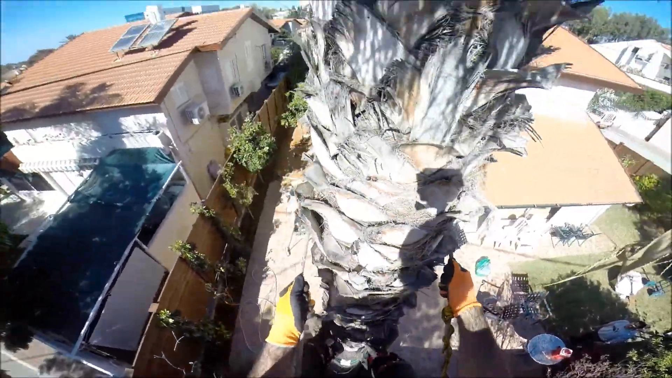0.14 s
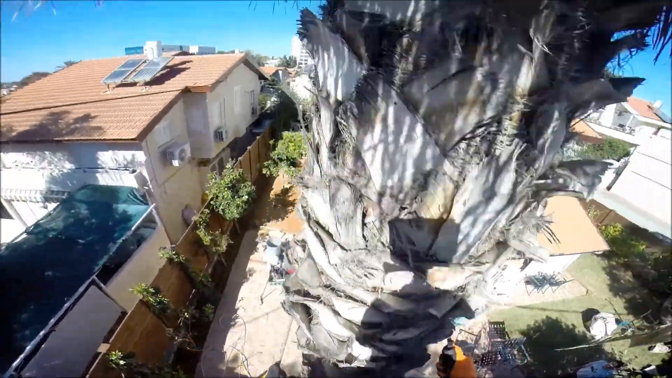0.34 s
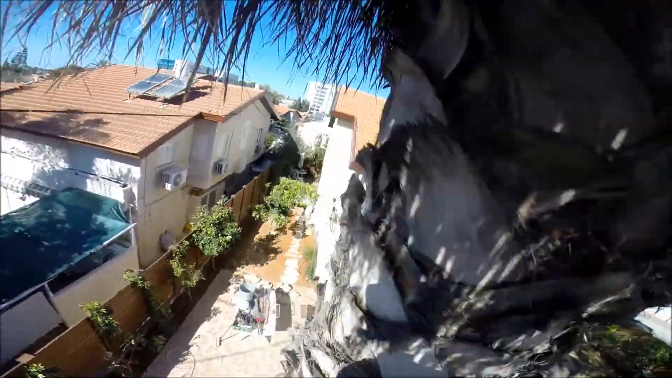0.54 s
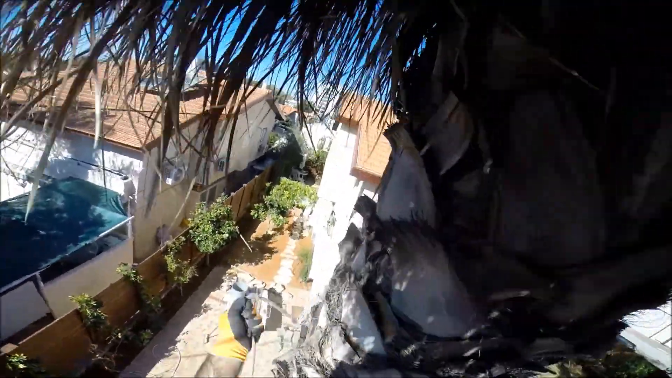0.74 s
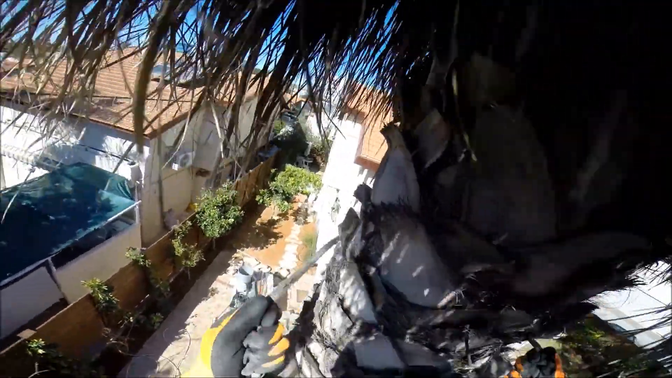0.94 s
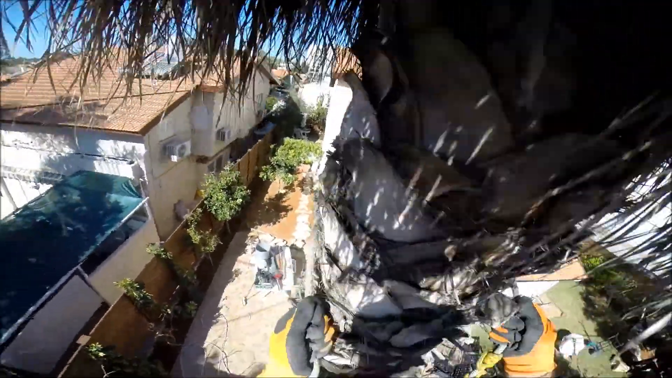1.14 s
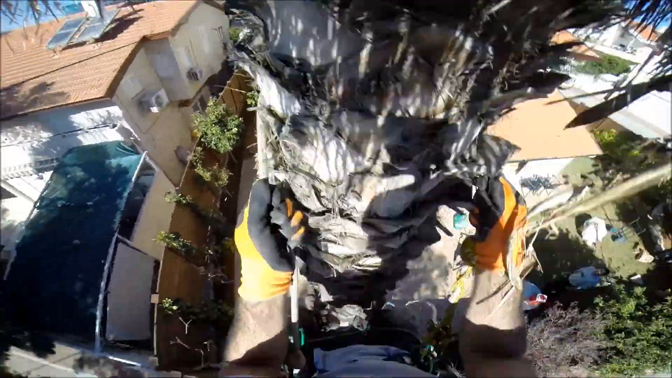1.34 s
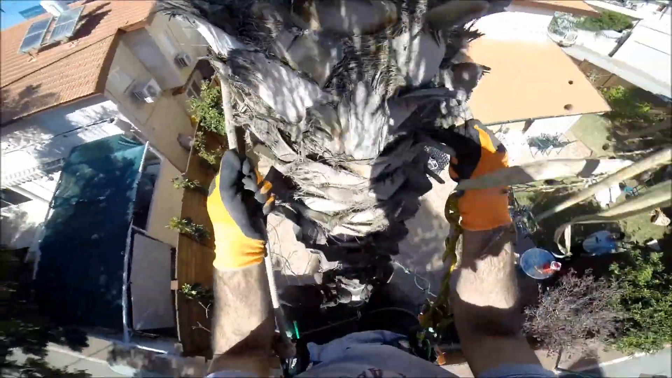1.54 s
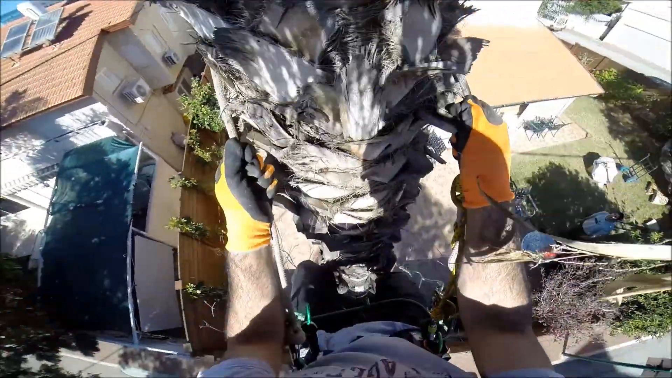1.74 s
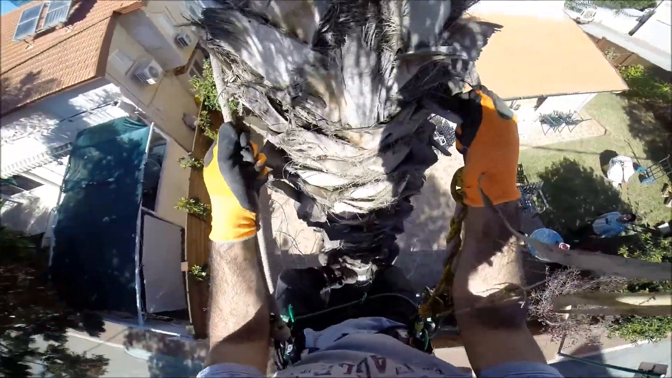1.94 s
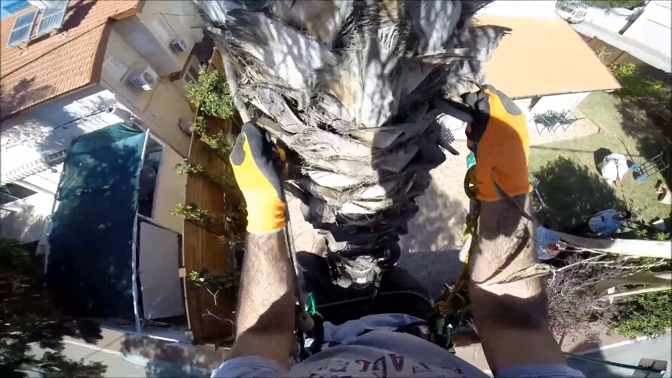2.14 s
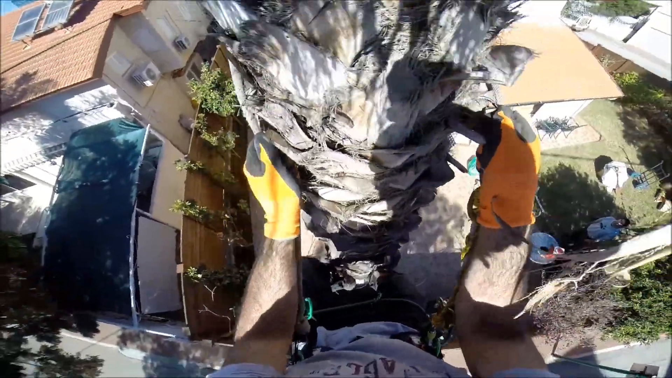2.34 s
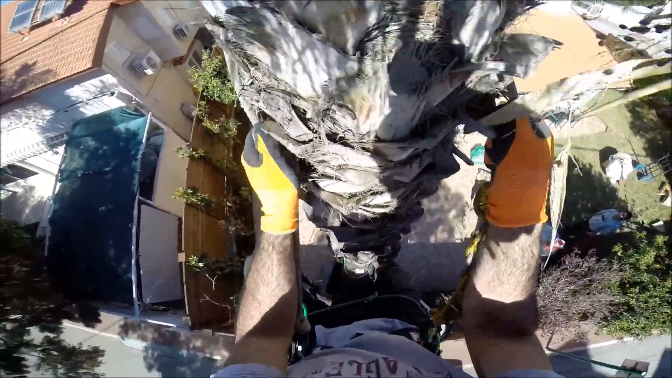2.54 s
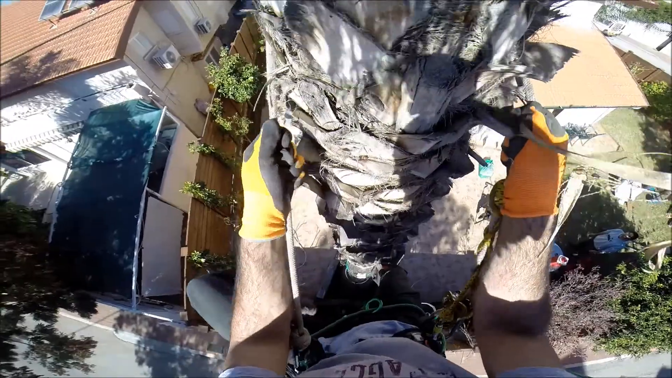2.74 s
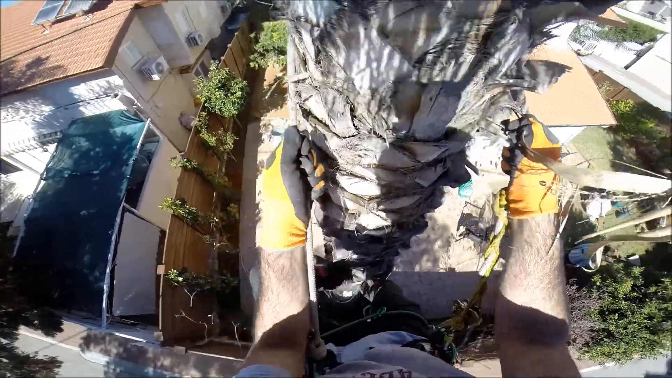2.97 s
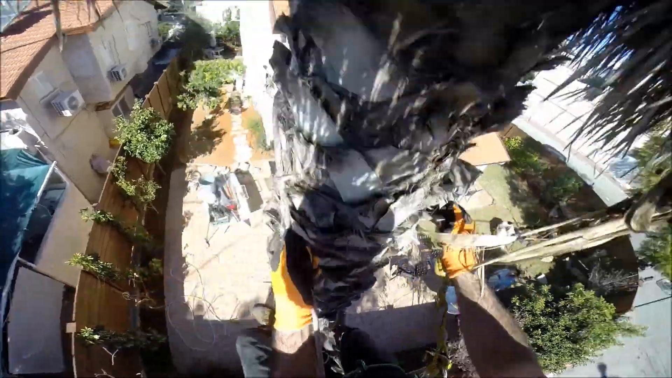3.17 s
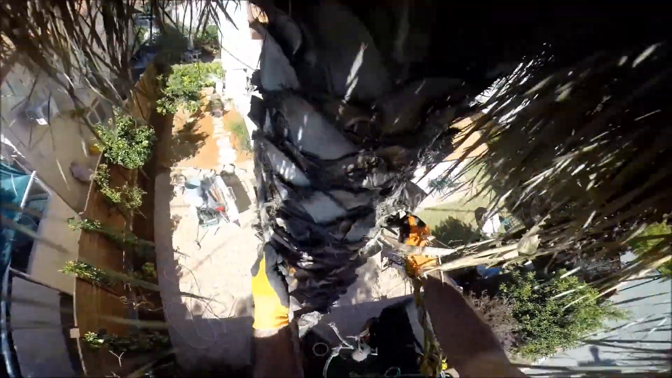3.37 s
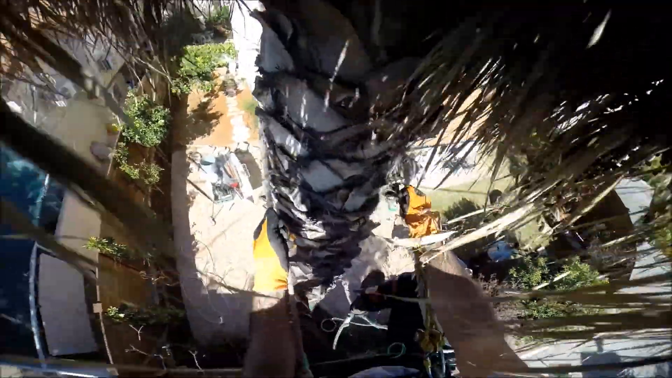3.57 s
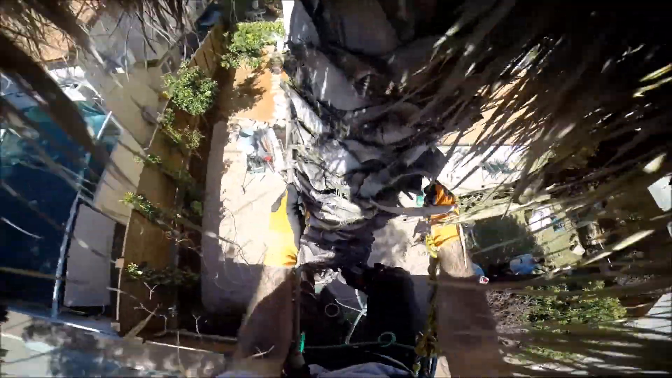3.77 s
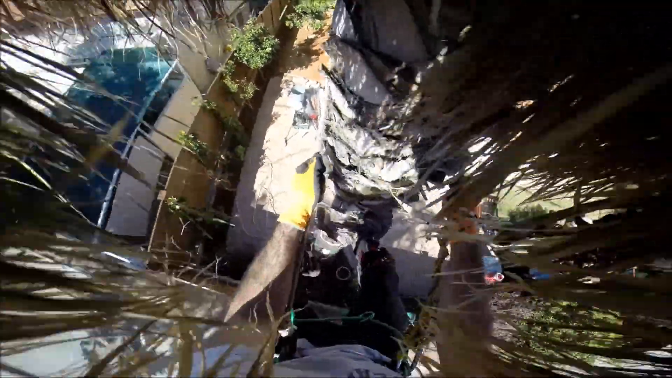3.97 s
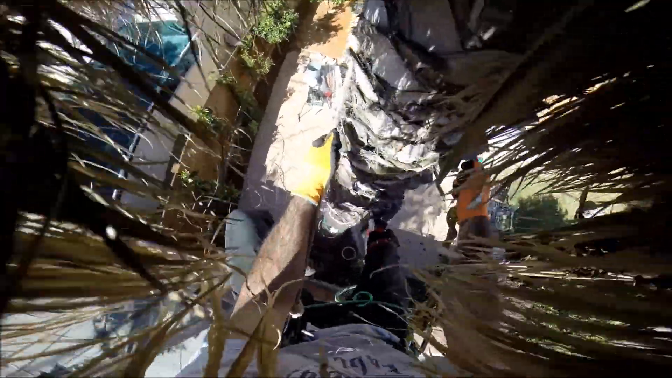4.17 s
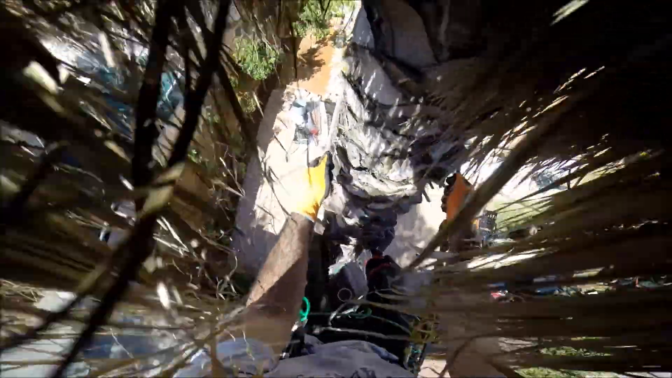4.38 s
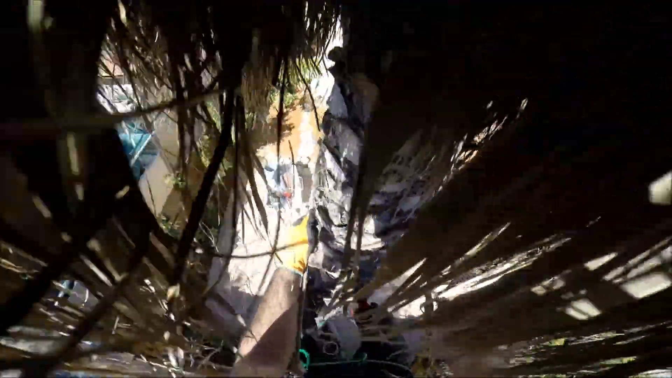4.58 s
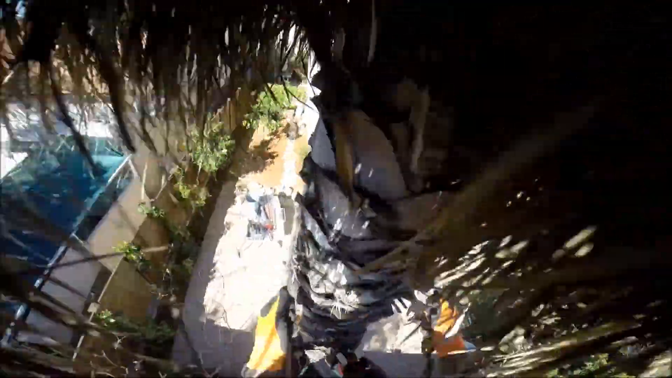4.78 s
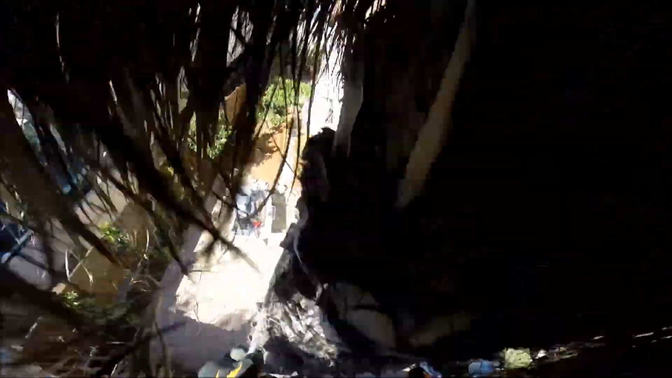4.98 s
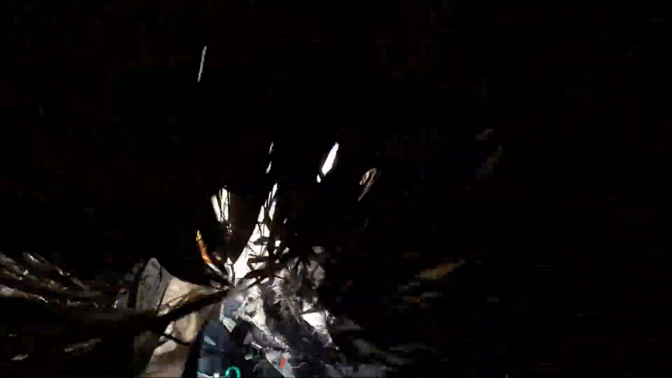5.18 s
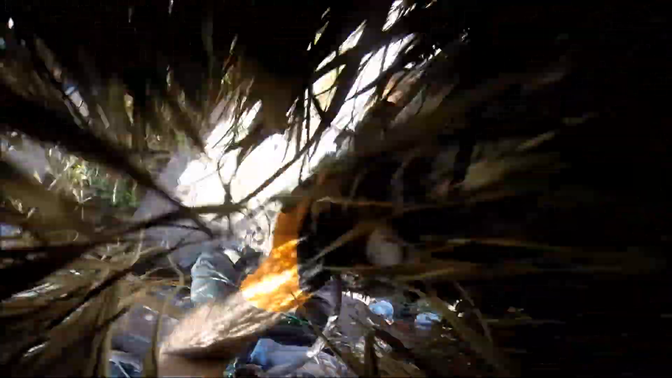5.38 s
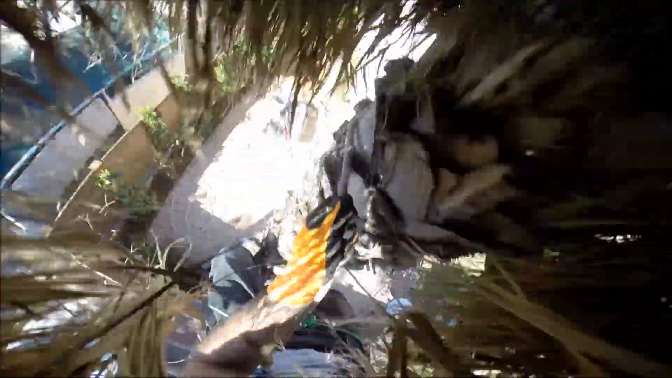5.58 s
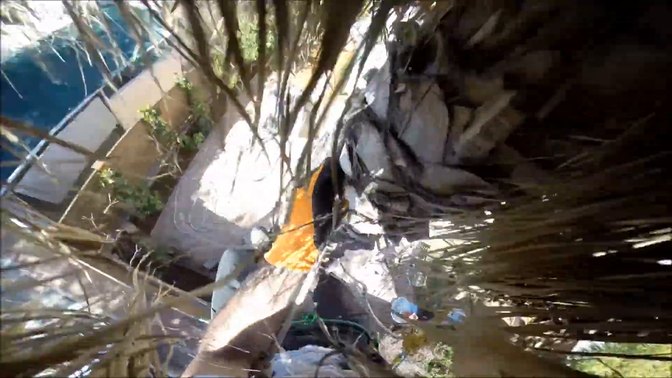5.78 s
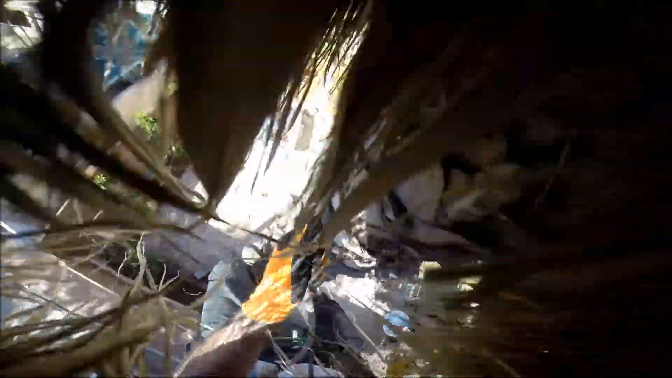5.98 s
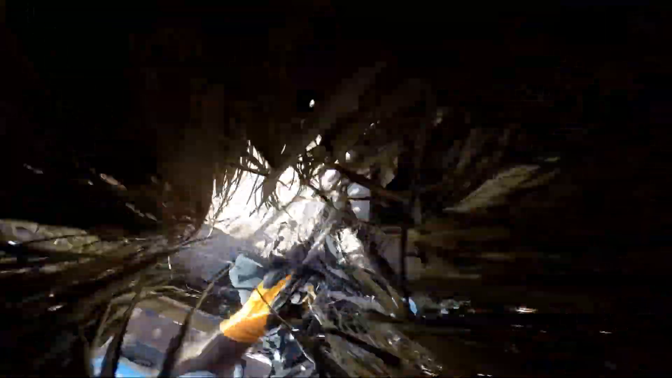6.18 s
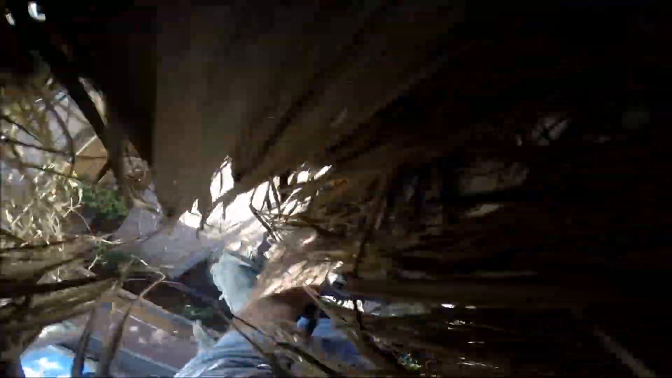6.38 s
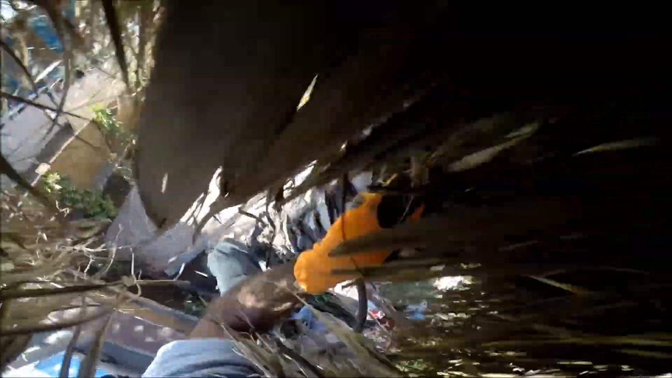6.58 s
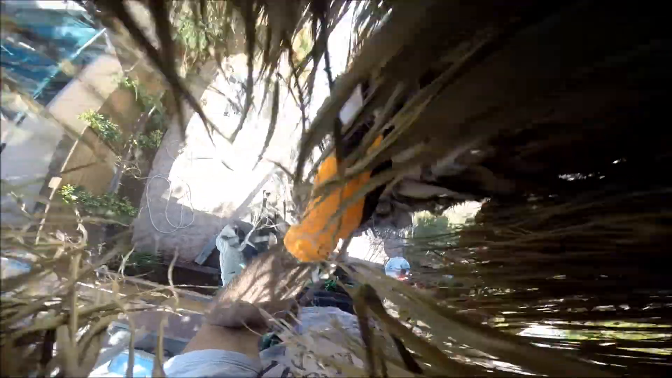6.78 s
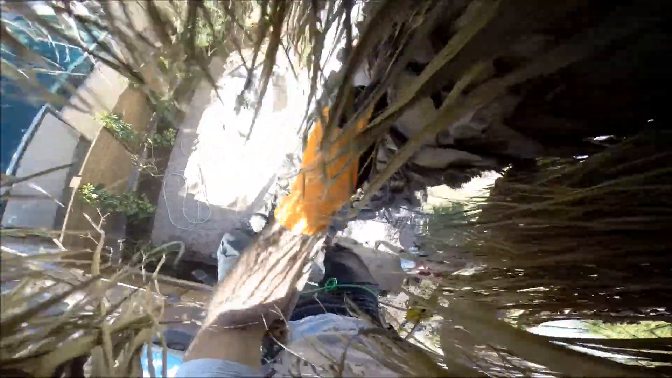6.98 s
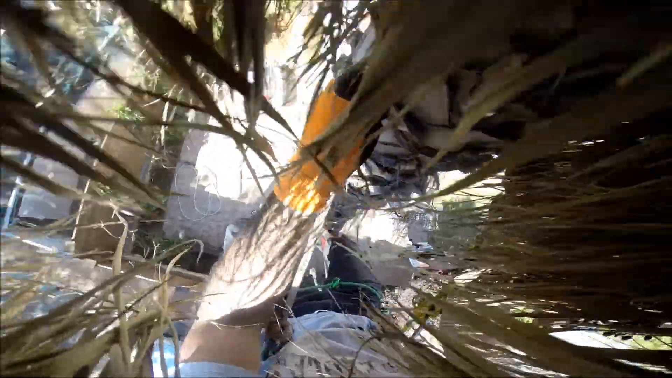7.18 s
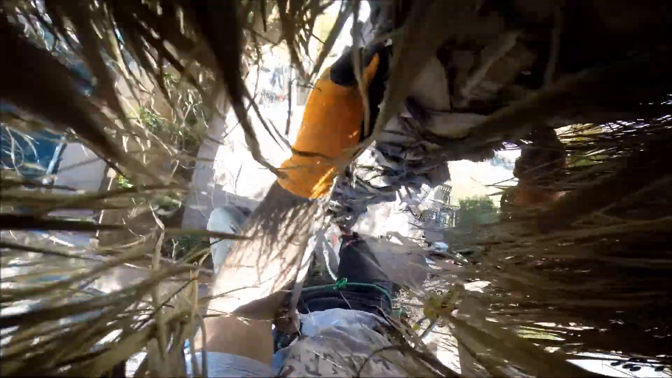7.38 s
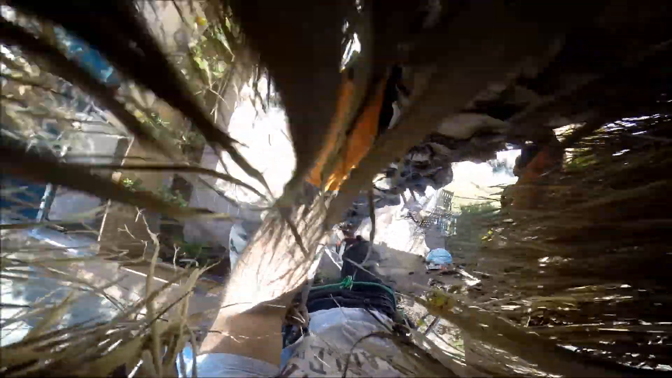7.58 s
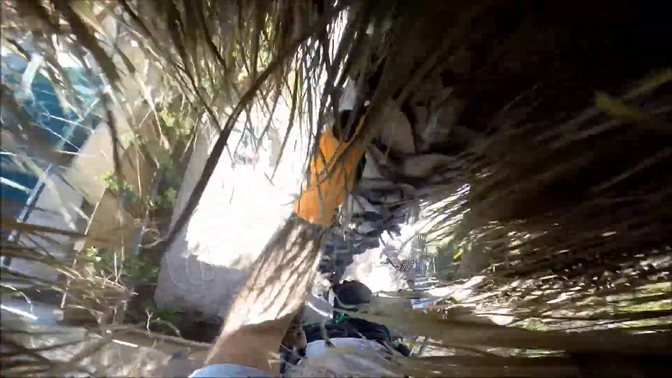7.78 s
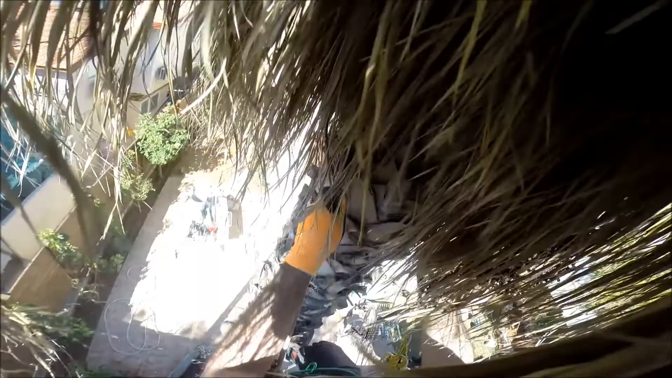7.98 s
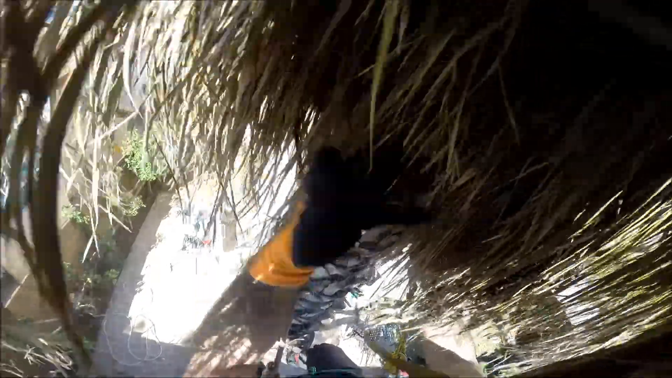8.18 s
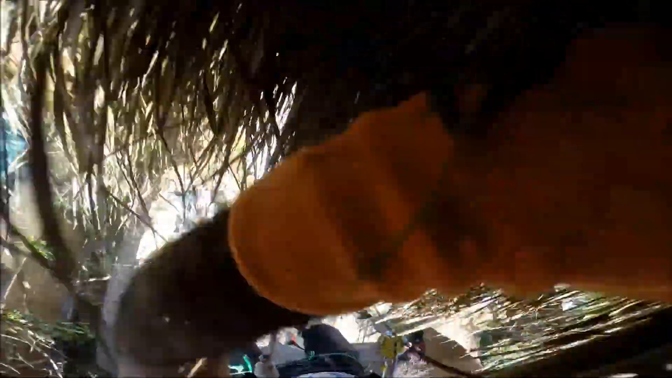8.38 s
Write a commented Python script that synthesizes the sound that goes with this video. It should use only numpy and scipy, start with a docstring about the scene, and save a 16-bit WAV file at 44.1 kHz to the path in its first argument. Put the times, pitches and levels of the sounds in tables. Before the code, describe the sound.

Gloves scuff rough bark, then dry palm fronds rustle, crackle and snap right against the microphone, with dull bumps and low rumble.

```python
"""High on a palm trunk, a climber with a small cased camera on the head works up into the dead fronds.
Friction of gloves and rope scuffs the bark. Dry leaflets crackle and snap by brittle fracture and rasp
by stick-slip, exciting the resonances of the case; broad blades cup it into a hollow cavity.
The moving mount rumbles and stalks land dull knocks; the open air behind is quiet and gives no echo."""
import sys
import numpy as np
from scipy import signal
from scipy.fft import rfft, irfft
from scipy.io import wavfile
from scipy.ndimage import uniform_filter1d

SR = 44100
rng = np.random.default_rng(int(sys.argv[2]) if len(sys.argv) > 2 else 0)


def to_wav(sig):
    """Store sig (one row per channel, or 1-D mono) as 16-bit WAV at the path in sys.argv[1].

    Samples outside -1..1 are clipped; the rate is SR.
    """
    pcm = np.clip(np.atleast_2d(sig), -1, 1) * 32767
    pcm = np.round(pcm).astype(np.int16)
    wavfile.write(sys.argv[1], SR, pcm.T)  # frames by channels


N = 371322
TREBLE_HZ = 4200  # crossover between body and treble

# spectrum of dry leaflets: frequency_hz, level_db
FROND_SPECTRUM = [(290, -32.5), (500, -17), (1070, -8.5), (1650, -0.5), (2260, -3), (3330, -3), (4070, -11),
                  (5750, -9), (8360, -22), (11600, -28.5), (15500, -38.5)]
# case resonances driven by contact: centre_hz, width_hz, gain_db
CONTACT_MODES = [(755, 80, 2.5), (876, 120, 5.5), (1360, 930, 6), (2030, 89, -3), (2252, 280, 7),
                 (2690, 340, 5), (3260, 150, 2.5), (4800, 68, -5), (9280, 230, 6.5), (11640, 380, 3.5)]
# case resonances driven through the air: centre_hz, width_hz, gain_db
AIRBORNE_MODES = [(320, 90, 20.5), (903, 160, 11.5), (1320, 360, 12.5), (3000, 740, 5), (3860, 250, -6.5)]


def undb(db):
    """Amplitude ratio of a level in decibels."""
    return 10 ** (np.asarray(db) / 20)


def unit(x):
    """Normalisation to rms 1."""
    return x / np.sqrt(np.mean(x ** 2))


def walk(rate_hz):
    """Random modulation: linear interpolation between Gaussian values drawn at rate_hz."""
    return np.interp(np.arange(N) / SR * rate_hz, np.arange(4096), rng.standard_normal(4096))


def response(spectrum, modes=(), size=2048):
    """Minimum-phase impulse response of a smooth spectrum with resonance peaks and dips."""
    f = np.maximum(np.arange(size // 2 + 1) * SR / size, 1)
    hz, db = np.transpose(spectrum)
    db = np.interp(np.log(f), np.log(hz), db)
    for centre_hz, width_hz, gain_db in modes:
        db = db + gain_db / (1 + (2 * (f - centre_hz) / width_hz) ** 2)
    cepstrum = irfft(np.log(undb(db)))
    # folding the cepstrum makes the response causal
    cepstrum[1:size // 2] *= 2
    cepstrum[size // 2 + 1:] = 0
    return irfft(np.exp(rfft(cepstrum)))


def through(x, impulse_response):
    """Linear filtering by convolution."""
    return signal.oaconvolve(x, impulse_response)[:len(x)]


def resonate(x, hz, width_hz):
    """Damped resonator with gain 1 at its centre frequency, which may move."""
    turn = np.exp(2j * np.pi * np.cumsum(hz * np.ones(N)) / SR)
    pole = np.exp(-np.pi * width_hz / SR)
    return 2 * np.real(turn * signal.lfilter([1 - pole], [1, -pole], x * turn.conj()))


def split(x):
    """Fourth-order crossover: body and treble sum to a flat magnitude response."""
    filters = [signal.butter(2, TREBLE_HZ, kind, fs=SR, output="sos") for kind in ("low", "high")]
    return [signal.sosfilt(np.tile(sos, (2, 1)), x) for sos in filters]


def add(out, start_s, sound):
    """Superposition of a sound from a given time."""
    i = int(start_s * SR)
    out[i:i + len(sound)] += sound[:N - i]


def strokes(rows, attack_s, release_s):
    """Envelope of incoherent movements, whose powers add; rows are start_s, length_s, level_db."""
    power = np.zeros(N)
    for start_s, length_s, db in rows:
        t = np.arange(int((length_s + 10 * release_s) * SR)) / SR
        shape = np.minimum(t / attack_s, 1) * np.exp(-np.maximum(t - length_s, 0) / release_s)
        add(power, start_s, (undb(db) * shape) ** 2)
    return np.sqrt(power)


def slip(length_s, attack_s=0.0027, release_s=0.007):
    """Envelope of one frictional slip: quick onset, hold and short exponential decay."""
    t = np.arange(9000) / SR
    return np.minimum(t / attack_s, 1) * np.exp(-np.maximum(t - length_s, 0) / release_s)


def crackle(rate_hz, spread_db, clump_db, clump_hz, ring_s, ring, hiss, size=2048):
    """Acoustic emission of dry fibre: clumps of tiny fractures, mostly small, a few large."""
    when, rank, sign = rng.random((80000, 3))[:int(rate_hz * N / SR)].T
    strength = undb(spread_db * np.minimum(-np.log(rank), 6))
    clicks = unit(np.bincount((when * N).astype(int), strength * np.sign(sign - .5), N))
    force = (clicks + hiss * rng.standard_normal(N)) * undb(clump_db * walk(clump_hz))
    # each click is heard directly, then as the ragged ring of whichever leaflet is in contact
    t = np.arange(size // 4) / SR
    contact = np.sin(np.pi * np.arange(size) / size)
    out, force = force.copy(), np.pad(force, (0, size))
    for i in range(0, N, size // 2):
        leaflet = rng.standard_normal(len(t)) * np.exp(-t / ring_s)
        leaflet /= np.linalg.norm(leaflet)
        add(out, i / SR, ring * signal.fftconvolve(force[i:i + size] * contact, leaflet))
    # the push sets the power; the fractures only share it out
    power = uniform_filter1d(uniform_filter1d(out ** 2, size=1800), size=1200)
    return out / np.sqrt(power + 1e-12)


def air(level_db=-51.5, swell_db=1):
    """Ambient noise: a faint outdoor background under slow amplitude modulation."""
    # frequency_hz, level_db
    spectrum = [(71, -37), (120, 3), (325, -3), (1170, -8.5), (2070, -16.5), (3170, -9),
                (3810, -15.5), (12100, -35)]
    noise = unit(through(rng.standard_normal(N), response(spectrum)))
    return noise * undb(level_db + swell_db * walk(2.1))


def mount(pressure, pressure_db=-4, rumble_db=-47):
    """Structure-borne vibration: the climber and pressing fronds shake the mount, over a steady rumble."""
    # spectrum of the shaking mount: frequency_hz, level_db
    shake_spectrum = [(10, -12.5), (24, -5.5), (35, -10), (48, -6), (110, -39), (3000, -125)]
    # spectrum of the steady rumble: frequency_hz, level_db
    rumble_spectrum = [(10, -12.5), (50, 0.5), (78, 0), (115, -23), (400, -83)]
    # heaves of the body: start_s, length_s, level_db
    heaves = [(0.18, 0.13, -24.5), (0.645, 0.05, -22), (0.78, 0.093, -24), (1.51, 0.2, -29.5),
              (2.71, 0.058, -28), (3.02, 0.12, -19), (4.02, 0.043, -20), (6.2, 0.071, -24.5)]
    climb = (0, 4.1, -35.5)  # one long tremble while the legs are climbing
    shake = through(rng.standard_normal(N), response(shake_spectrum, size=16384))
    shake /= np.sqrt(uniform_filter1d(shake ** 2, size=4000))
    movement = strokes(heaves + [climb], attack_s=0.0324, release_s=0.051)
    sway = np.hypot(movement, undb(pressure_db) * pressure)
    rumble = unit(through(rng.standard_normal(N), response(rumble_spectrum, size=16384)))
    return shake * sway + rumble * undb(rumble_db)


def scratches(note_db=7, relative_width=0.16):
    """Friction excites a resonance: gloves and gear scratch the bark, each spot with its own note."""
    # scrapes on the bark: start_s, length_s, level_db, note_hz
    scrapes = [(0.168, 0.03, -37, 3320), (0.197, 0.0036, -26, 3240), (0.599, 0.006, -32.5, 1280),
               (0.72, 0.019, -39, 1550), (1.011, 0.023, -28, 1310), (1.552, 0.015, -30, 2500),
               (1.58, 0.015, -29.5, 1400), (1.636, 0.01, -29, 2220), (2.305, 0.03, -37, 2200),
               (2.719, 0.006, -30.5, 2960), (2.872, 0.033, -36.5, 1700), (3.03, 0.018, -35.5, 4370)]
    out = np.zeros(N)
    for start_s, length_s, db, hz in scrapes:
        spectrum = [(hz / 16, -36), (hz, 0), (hz * 16, -44)]  # falls 9 dB an octave below, 11 above
        modes = AIRBORNE_MODES + [(hz, relative_width * hz, note_db)]
        shape = slip(length_s)
        scrape = through(rng.standard_normal(len(shape)), response(spectrum, modes))
        add(out, start_s, unit(scrape) * shape * undb(db))
    return out


def gloves(treble_db=-2):
    """Roughness noise: gloves and rope scuff the fibrous trunk and reach the case through the air."""
    # spectrum of rubbed bark: frequency_hz, level_db
    bark_spectrum = [(120, -36), (200, -25), (304, -33), (665, -24), (1350, -16.5), (1810, -18),
                     (2210, -7.5), (3890, -16.5), (5800, -16), (15500, -41)]
    # new grips on the trunk: start_s, length_s, level_db
    grips = [(0.64, 0.16, -43), (0.9, 0.24, -39), (1.33, 0.09, -36.5), (1.46, 0.11, -35), (1.62, 0.22, -44),
             (2.21, 0.13, -40.5), (2.39, 0.14, -40), (2.55, 0.039, -36), (2.64, 0.24, -43),
             (3.07, 0.27, -41.5)]
    chafe = (0.3, 7.8, -49.5)  # the rope keeps chafing once it takes the weight
    grit = crackle(rate_hz=1200, spread_db=3.5, clump_db=2.8, clump_hz=49,
                   ring_s=0.0043, ring=0.78, hiss=0.65)
    body, treble = split(unit(through(grit, response(bark_spectrum, AIRBORNE_MODES))))
    envelope = strokes(grips + [chafe], attack_s=0.024, release_s=0.085)
    return envelope * (body + undb(treble_db) * treble)


def slides(rasp_db=9, rasp_width_hz=260):
    """Stick-slip friction: a dry strip catches and slips free in a fast, papery rasp."""
    # sliding strips: start_s, length_s, level_db, rasp_hz, tilt_db_per_octave
    strips = [(0.668, 0.022, -35, 6860, 6.5), (0.743, 0.01, -28, 1500, 7), (1.091, 0.018, -21.5, 1650, 3),
              (1.226, 0.029, -21.5, 2700, 5), (1.288, 0.047, -25.5, 1700, 5), (3.658, 0.064, -22, 2700, 5),
              (4.925, 0.011, -12, 2250, 1.5), (6.008, 0.032, -22, 5670, 8.5),
              (6.688, 0.011, -11, 1700, 2.5), (6.708, 0.015, -16, 1700, 4.5),
              (7.118, 0.072, -23.5, 1740, 6), (7.152, 0.032, -22, 6500, 10), (7.316, 0.04, -17, 5560, 11.5),
              (7.366, 0.12, -22, 4650, 4), (7.794, 0.016, -13, 2320, -2)]
    grit = crackle(rate_hz=5000, spread_db=2.5, clump_db=2, clump_hz=200,
                   ring_s=0.0004, ring=0.39, hiss=0.7)
    out = np.zeros(N)
    for start_s, length_s, db, hz, tilt in strips:
        shape = slip(length_s)
        rub = grit[int(start_s * SR):][:len(shape)]
        # a faster slip tilts the spectrum upward
        spectrum = [(f, level + tilt * np.log2(np.clip(f / TREBLE_HZ, .5, 2)))
                    for f, level in FROND_SPECTRUM]
        modes = CONTACT_MODES + [(hz, rasp_width_hz, rasp_db)]
        rasp = unit(through(rub, response(spectrum, modes)))
        add(out, start_s, rasp * shape * undb(db))
    return out


def snaps(gain_db=-1, rise_s=0.00025, crack_s=0.0035, tear_s=0.0018, ring_s=0.0024, glint_s=0.00025):
    """Brittle fracture: a rib cracks, its fibres tear and it rings for a few cycles of its own note."""
    # breaking leaflets and ribs: start_s, level_db, ring_hz, relative_treble_db
    breaks = [(1.0242, -15.5, 2630, -24), (1.0576, -14, 1500, -8), (1.068, -6.5, 2910, -3),
              (1.09, -13, 2840, 1), (1.101, -11, 1500, -12), (1.1215, -15, 2600, -10),
              (1.1324, -8, 2840, -8.5), (1.187, -13.5, 1990, -5), (1.2147, -12, 1200, -8),
              (1.229, -12, 2700, -12), (3.2345, -8, 2800, -7), (3.261, -10, 2830, -25),
              (3.2875, -9, 2860, 0), (3.451, -12.5, 2700, -2), (3.5, -13, 2260, -3), (3.5695, -10, 2190, 2),
              (3.683, -11.5, 2300, -1), (3.903, -9.5, 1750, 4), (4.1604, -10, 1770, -3.5),
              (4.5282, -7, 1690, -8), (4.5408, -5.5, 1550, -10.5), (4.639, -4, 1510, -11.5),
              (5.023, -13.5, 1680, -5), (5.065, -6.5, 2580, -26), (5.105, -6, 2230, -18),
              (5.29, -10.5, 1640, -10), (5.484, -8.5, 1690, -6), (5.5394, -11.5, 3280, -7),
              (5.5615, -10.5, 3270, -6), (5.579, -8, 2680, -3.5), (5.704, -8, 1720, -8),
              (5.723, -10, 2700, -5), (5.8082, -9.5, 2200, -12), (6.0398, -6, 3520, -3.5),
              (6.0998, -11.5, 4620, -1), (6.2555, -11, 1800, -10), (6.269, -5.5, 1830, -21),
              (7.353, -12, 5580, -1), (7.678, -17, 5560, -2), (7.918, -8, 2270, -6),
              (7.998, -6.5, 3240, -5.5), (8.0488, -10.5, 2150, -11), (8.1217, -7, 2010, -19),
              (8.1568, -12.5, 1780, -18), (8.3579, -13.5, 1920, -12), (8.379, -12, 2360, -6)]
    t = np.arange(2000) / SR
    onset = 1 - np.exp(-t / rise_s)
    case, out = response(FROND_SPECTRUM, CONTACT_MODES), np.zeros(N)
    for start_s, db, hz, treble_db in breaks:
        crack, fibres = rng.standard_normal((2, len(t)))
        tear = 0.91 * unit(fibres ** 3) * np.exp(-t / tear_s)
        burst = onset * (crack * np.exp(-t / crack_s) + tear)
        note = onset * np.sin(2 * np.pi * hz * t) * np.exp(-t / ring_s)
        body, treble = map(unit, split(unit(through(burst, case)) + 0.8 * unit(note)))
        # the first instant of the break is its brightest
        _, glint = split(through(crack * np.exp(-t / glint_s), case))
        treble = unit(treble + 0.23 * unit(np.diff(glint, prepend=0)))
        share = min(undb(treble_db), .8)
        snap = np.sqrt(1 - share ** 2) * body + share * treble
        peak_rms = np.sqrt(uniform_filter1d(snap ** 2, size=100).max())
        add(out, start_s, snap * undb(db + gain_db) / peak_rms)
    return out


def effort():
    """Common modulation: each push drives the rustle, its treble and the pressure on the case."""
    # pushes through the fronds: start_s, length_s, level_db, relative_treble_db, relative_pressure_db
    pushes = [(1.085, 0.11, -29, 7, -14), (1.175, 0.08, -24.5, 8, -12), (3.203, 0.18, -25, 2, -11.5),
              (3.338, 0.1, -16.5, 3, -17), (3.449, 0.13, -18.5, 4, -17), (3.589, 0.13, -21.5, 5.5, -17),
              (3.679, 0.11, -24, 2, -14.5), (3.819, 0.12, -20.5, -1, -14), (3.886, 0.26, -14, -1.5, -16.5),
              (4.275, 0.13, -21, 0, -18.5), (4.39, 0.084, -16.5, -3.5, -11.5),
              (4.471, 0.13, -20.5, 0.5, -22), (4.567, 0.055, -16.5, -2, -16),
              (4.658, 0.16, -25.5, -2.5, -18), (4.796, 0.19, -20, 0, -19), (4.955, 0.19, -16.5, 0, -15),
              (5.133, 0.13, -19, -2.5, -10), (5.267, 0.087, -21.5, 0.5, -9.5), (5.365, 0.14, -20, -1, -10),
              (5.481, 0.21, -25.5, -1, -8.5), (5.64, 0.12, -17.5, 3.5, -19.5), (5.749, 0.13, -25, 3.5, -17),
              (5.963, 0.096, -22.5, 7, -11.5), (6.135, 0.14, -17.5, -1.5, -13),
              (6.332, 0.059, -24.5, -0.5, -7.5), (6.401, 0.048, -13.5, -1.5, -15),
              (6.532, 0.15, -23, -3.5, -15), (6.67, 0.24, -22, 2.5, -12.5), (7.2, 0.065, -28, 4, -16),
              (7.27, 0.075, -20, 0, -22), (7.525, 0.16, -20, -2, -35), (7.717, 0.085, -23, 0.5, -8.5),
              (7.775, 0.12, -17, 5.5, -11), (7.915, 0.094, -21, 3.5, -10.5),
              (8.008, 0.094, -24.5, -7, -8.5), (8.355, 0.07, -17.5, -1.5, -11.5)]
    skirt = (3.23, 5.3, -32.5, -2, -7.5)  # inside the skirt of fronds, leaflets always lie on the case
    start_s, length_s, db, treble_db, pressure_db = np.vstack([pushes, skirt]).T
    return [strokes(zip(start_s, length_s, db + offset_db), attack_s=0.041, release_s=0.038)
            for offset_db in (0, treble_db, pressure_db)]


def fronds(push, edge, treble_db=-1, flutter_db=0.5, splinter_db=-3):
    """Contact excitation: dry leaflets crackle and scrape over the case, driving its resonances."""
    grit = crackle(rate_hz=1500, spread_db=3, clump_db=2.03, clump_hz=120,
                   ring_s=0.0048, ring=0.66, hiss=0.73)
    grit += undb(splinter_db) * splinters()
    body, treble = split(unit(through(grit, response(FROND_SPECTRUM, CONTACT_MODES))))
    # thin edges sound brighter than flat blades, and they trade places quickly
    treble *= undb(treble_db + flutter_db * walk(25))
    return push * body + edge * treble


def splinters(rate_hz=380, spread_db=4.2, cycles=2, low_hz=6000, high_hz=14500, clump_db=7.5):
    """Short pulses have broad spectra: brittle tips splinter in bunches of ticks with no clear pitch."""
    t, out = np.arange(200) / SR, np.zeros(N)
    for when, rank, pitch in rng.random((20000, 3))[:int(rate_hz * N / SR)]:
        hz = low_hz * (high_hz / low_hz) ** pitch
        age = t * hz / cycles
        strength = undb(spread_db * min(-np.log(rank), 4))
        tick = hz * np.sqrt(age) * np.exp(-2 * age) * np.sin(2 * np.pi * hz * t)
        add(out, when * N / SR, strength * tick)
    bunches = unit(out * undb(clump_db * np.minimum(walk(170), 1.5)))
    # a thin tip can only bear so much, so no bunch stands far above the rest
    return unit(bunches / np.sqrt(1 + uniform_filter1d(bunches ** 2, size=200) / 10))


def drag(pressure):
    """Forced vibration: fronds that press on the case rattle it at low frequencies."""
    # spectrum of the rattle: frequency_hz, level_db
    spectrum = [(40, -24), (90, 5), (230, -4), (300, 1.5), (420, -4.5), (750, -4), (1400, -65)]
    judder = crackle(rate_hz=900, spread_db=3.5, clump_db=3.5, clump_hz=120,
                     ring_s=0.0022, ring=0.46, hiss=0.48)
    return pressure * unit(through(judder, response(spectrum)))


def rope(centre_hz=1250, width_hz=290, rough_db=1):
    """Uneven friction of the rope drives one narrow resonance: a thin, hollow rub."""
    # draws of the rope round the trunk: start_s, length_s, level_db
    rubs = [(1.36, 0.28, -43.5), (3.11, 0.1, -37.5), (3.19, 0.16, -27.5)]
    friction = rng.standard_normal(N) * undb(rough_db * walk(60))
    ring = resonate(resonate(friction, centre_hz, width_hz), centre_hz, 4 * width_hz)
    return strokes(rubs, attack_s=0.051, release_s=0.039) * unit(ring)


def knocks(thud_s=0.0057, chatter_s=0.0044):
    """Damped impact: a stiff stalk bumps the case with a dull thud and a moment of chatter."""
    # stalks striking the case: start_s, level_db, thud_hz
    impacts = [(3.261, -15, 112), (4.063, -13.5, 74.5), (6.22, -10, 274), (6.299, -8, 156),
               (7.894, -16.5, 89)]
    # spectrum of the chatter: frequency_hz, level_db
    spectrum = [(30, -7), (300, -6.5), (700, -11), (1500, -15.5), (5000, -40)]
    t = np.arange(4000) / SR
    case, out = response(spectrum), np.zeros(N)
    for start_s, db, hz in impacts:
        chatter = through(rng.standard_normal(len(t)) * np.exp(-t / chatter_s), case)
        thud = np.sin(2 * np.pi * hz * t) * np.exp(-t / thud_s)
        bump = unit(thud) + 0.7 * unit(chatter)
        peak_rms = np.sqrt(uniform_filter1d(bump ** 2, size=200).max())
        add(out, start_s, bump * undb(db) / peak_rms)
    return out


def cupped(x, drift=0.015, shade_db=-4.5):
    """Cavity resonance: blades close round the case, and the hollow's pitch wanders as they shift."""
    # spells when broad blades cup the case: start_s, length_s, closeness_db
    spells = [(4.11, 1.2, -8), (5.6, 1.2, -6), (7.11, 0.6, 0)]
    # resonances of the hollow: centre_hz, width_hz, gain_db
    modes = [(1630, 235, 0), (2840, 970, -12.5), (4630, 134, 1), (5560, 380, 0)]
    stretch = 1 + drift * walk(5.2)
    ring = sum(undb(db) * resonate(x, hz * stretch, width_hz) for hz, width_hz, db in modes)
    hollow = undb(shade_db) * x + ring
    closeness = strokes(spells, attack_s=0.05, release_s=0.05)
    return x + closeness * (hollow - x)


def squeaks(pitch_hz=1670, waver=0.0488, rasp_db=-5):
    """Self-excited oscillation: stick and slip lock briefly to a wavering note, with a rasp on top."""
    # judders of a taut leaflet over the case: start_s, length_s, level_db
    judders = [(6.0472, 0.0033, -10.5), (6.0938, 0.003, -9), (6.1022, 0.003, -6), (7.646, 0.007, -11.5)]
    hz = pitch_hz * (1 + waver * walk(400))
    note = np.sin(2 * np.pi * np.cumsum(hz) / SR)
    rasp = through(rng.standard_normal(N), response(FROND_SPECTRUM, CONTACT_MODES))
    envelope = strokes(judders, attack_s=0.00069, release_s=0.0012)
    return envelope * (unit(note) + undb(rasp_db) * unit(rasp))


def scene():
    """Superposition of all sources at the one microphone."""
    push, edge, pressure = effort()
    leaves = cupped(fronds(push, edge) + slides() + snaps() + squeaks())
    contact = leaves + drag(pressure) + knocks()
    return (contact + gloves() + scratches() + rope() + mount(pressure) + air())[None]


def record(dry):
    """Soft saturation and band limiting: the camera rounds off the loudest cracks and cuts the top."""
    rounded = dry / (1 + dry ** 6) ** (1 / 6)
    low_pass = signal.ellip(10, .2, 80, 15300, fs=SR, output="sos")
    return signal.sosfilt(low_pass, rounded)


dry = scene()
out = record(dry)
to_wav(out)
```